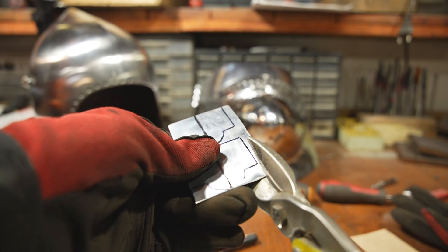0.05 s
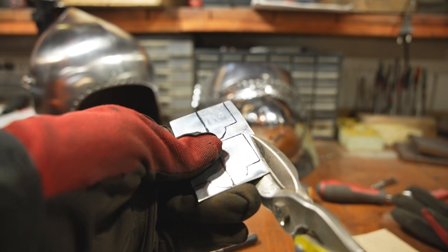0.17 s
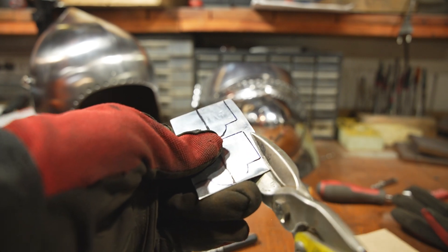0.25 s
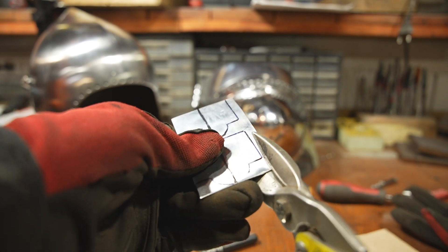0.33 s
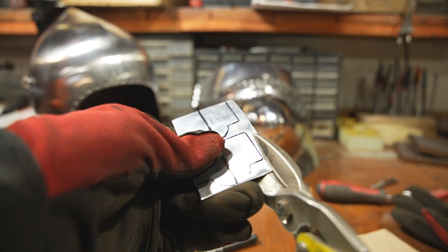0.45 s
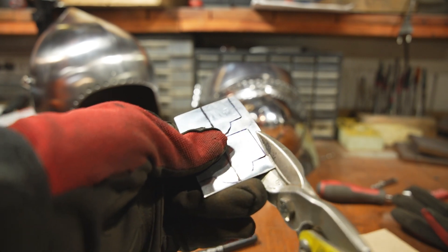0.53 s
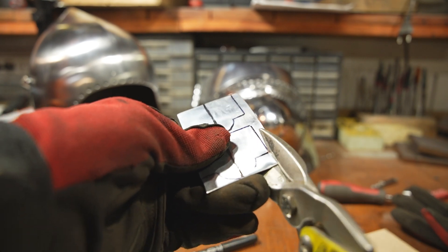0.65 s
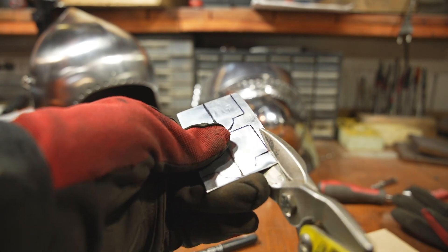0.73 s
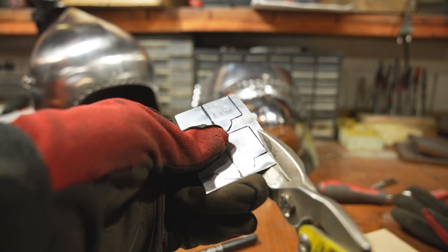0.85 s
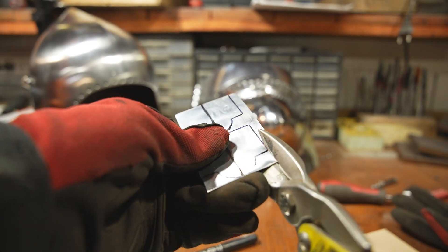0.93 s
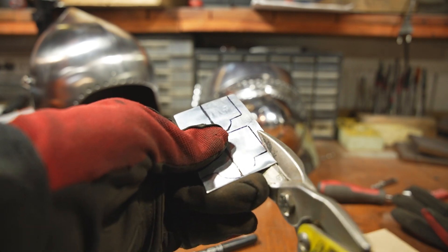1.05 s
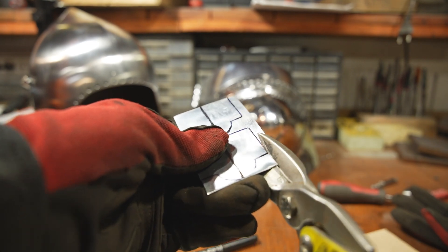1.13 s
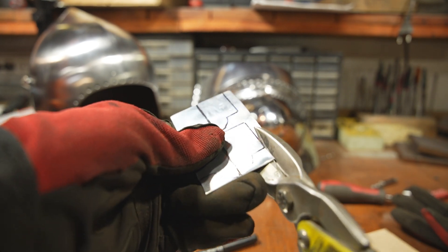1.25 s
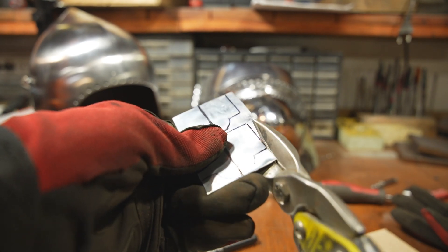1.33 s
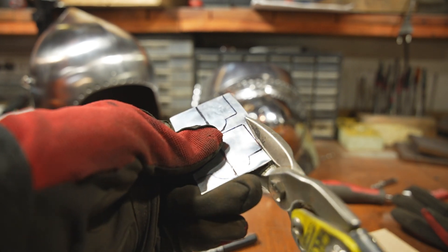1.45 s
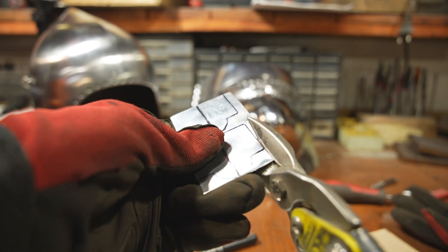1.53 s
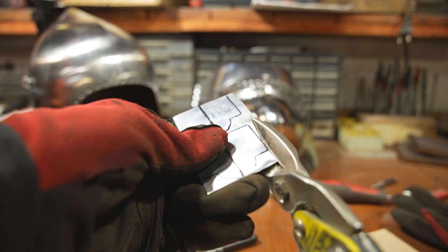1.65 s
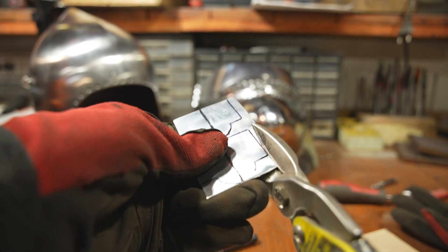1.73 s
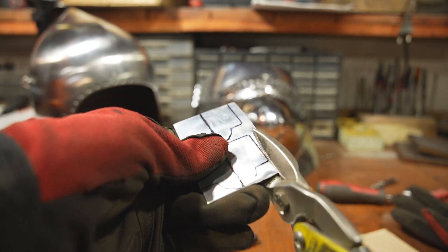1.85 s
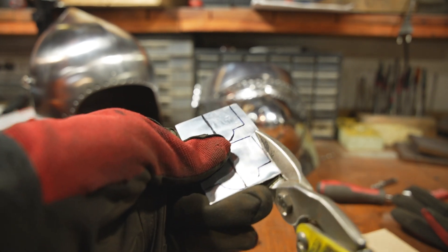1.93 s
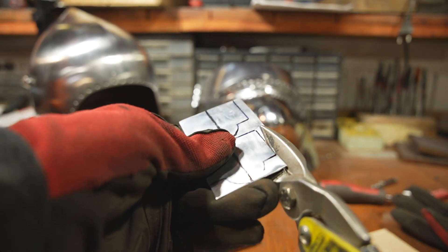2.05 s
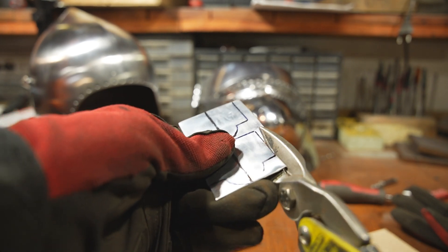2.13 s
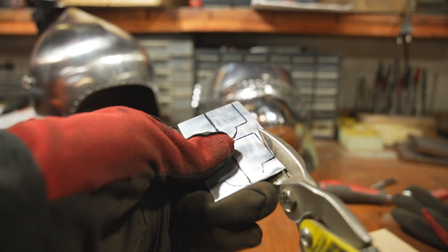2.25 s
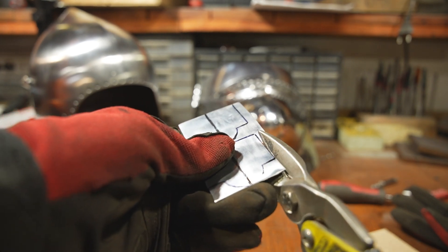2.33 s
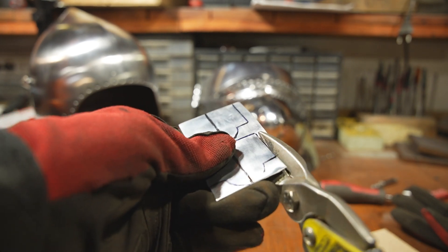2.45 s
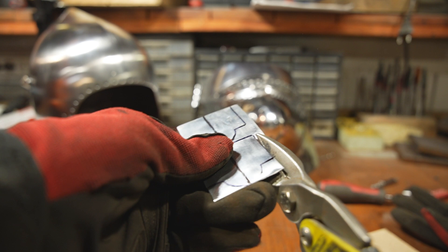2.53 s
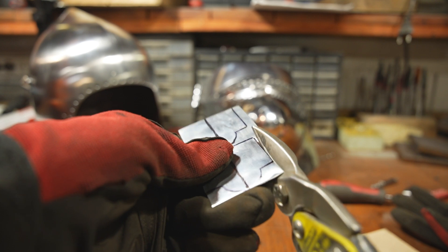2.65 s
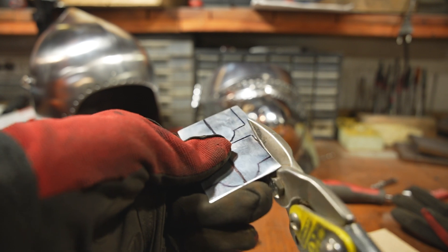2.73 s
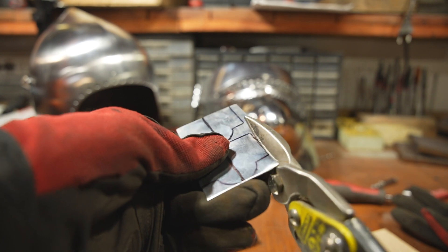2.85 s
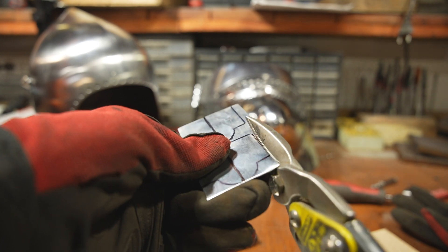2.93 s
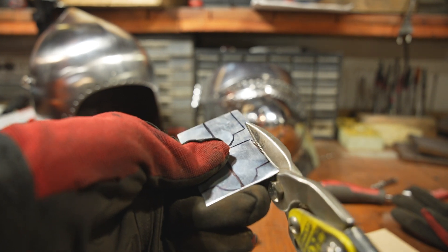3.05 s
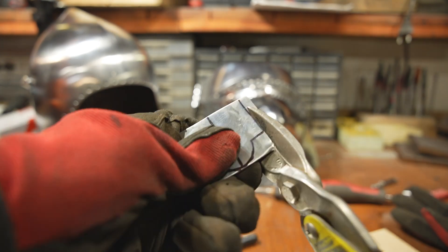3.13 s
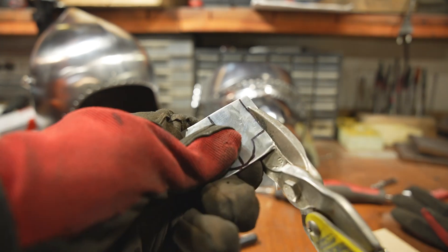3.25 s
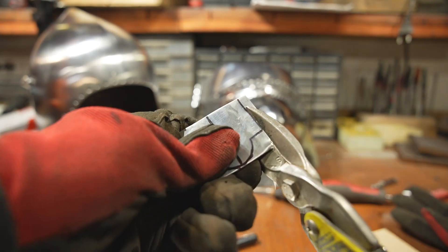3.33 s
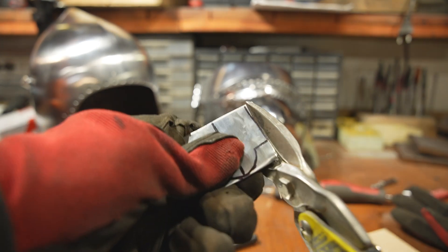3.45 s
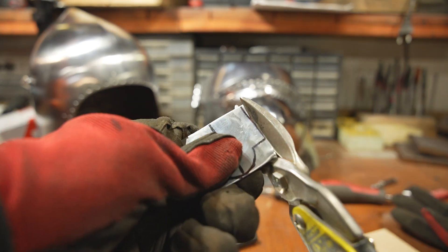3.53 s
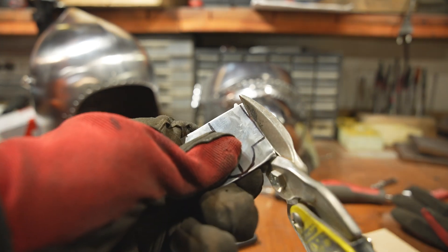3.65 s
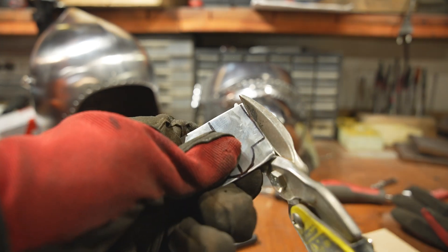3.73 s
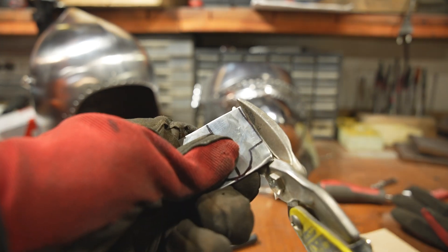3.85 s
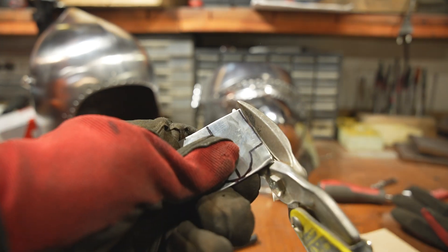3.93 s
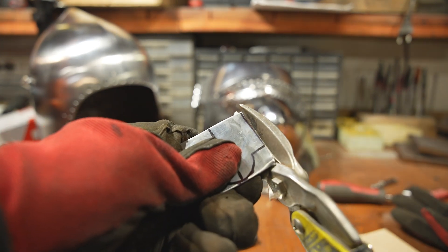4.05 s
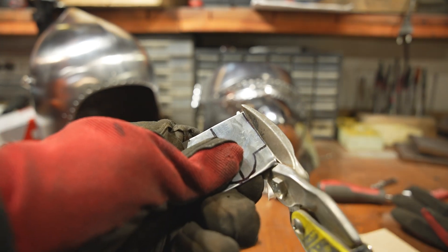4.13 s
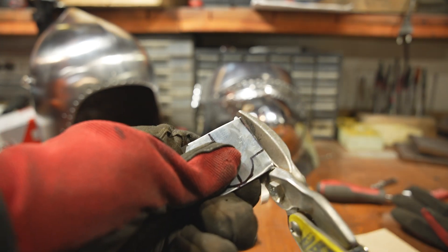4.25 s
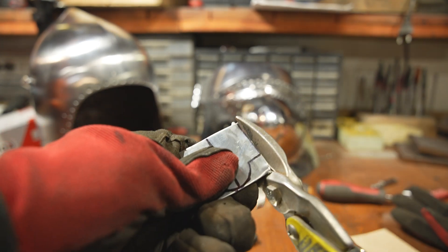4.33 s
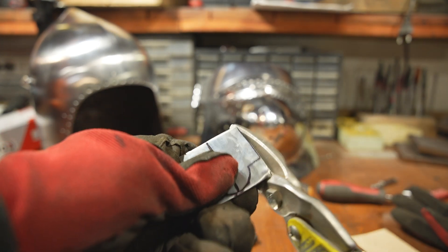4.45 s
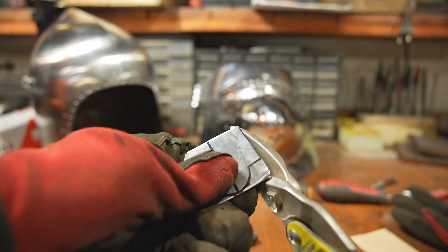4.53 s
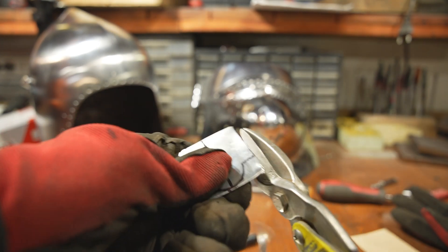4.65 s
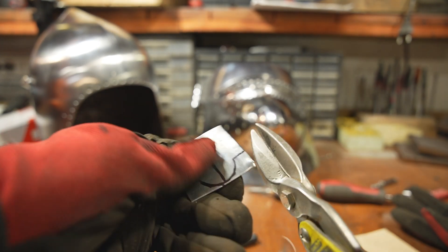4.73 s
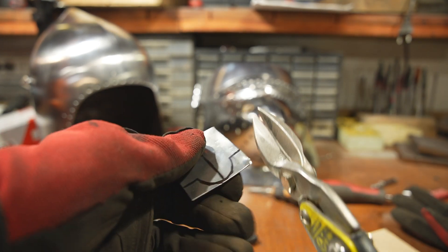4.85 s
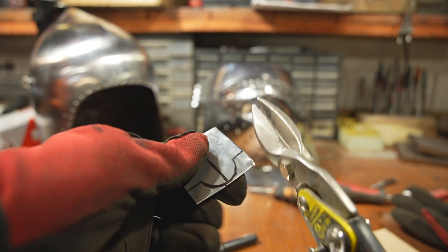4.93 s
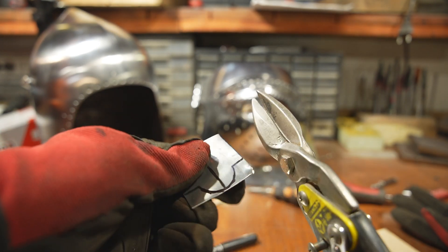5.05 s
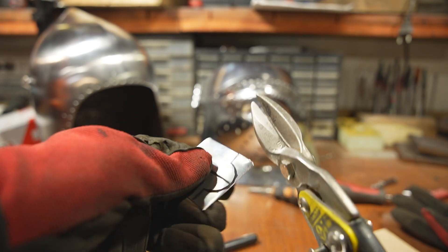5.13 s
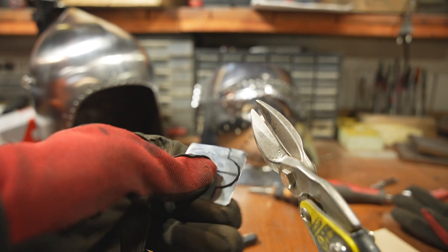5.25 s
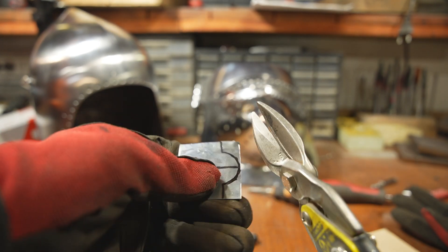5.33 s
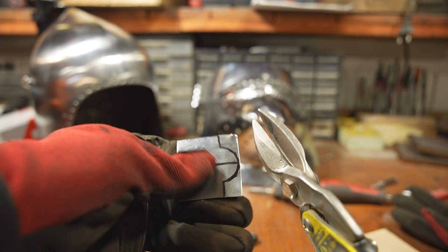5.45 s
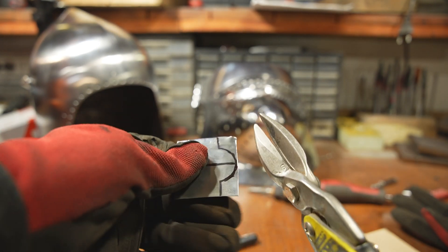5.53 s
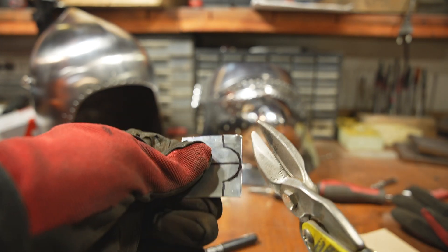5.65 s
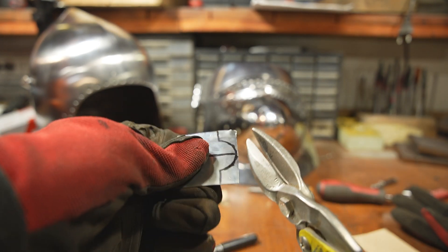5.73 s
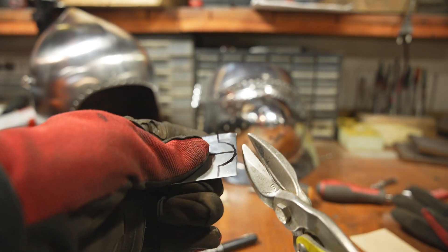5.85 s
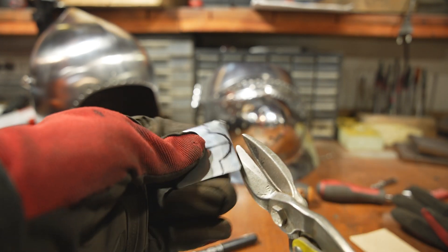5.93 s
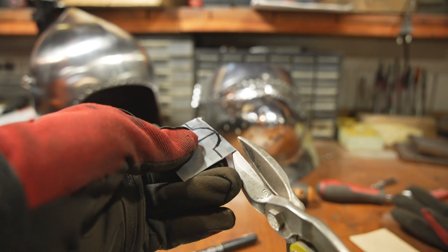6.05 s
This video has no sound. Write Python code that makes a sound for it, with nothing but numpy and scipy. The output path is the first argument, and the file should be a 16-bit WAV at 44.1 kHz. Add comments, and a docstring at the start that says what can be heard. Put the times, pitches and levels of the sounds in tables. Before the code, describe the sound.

Close, dry metal-cutting crunches and small blade ticks, a loud sharp snap, a tinkling steel scrap tumbling, then glove rustle and a brief edge scrape.

```python
"""In a small, quiet workshop, hand snips cut a piece of thin sheet steel held in a gloved hand over a workbench.
Close to the microphones, three cuts crunch as the blades stick and slip; each slip kicks the damped sheet.
The fourth cut snaps through, the jaws shudder, and the offcut bounces and rings further away.
Around the cuts the blades tick against the sheet and slide on it; after the snap the glove rubs the sheet,
fingers knock it and its edge skips on the blade. Filtered noise makes the room air and the reverberant tail."""
import sys
import numpy as np
from scipy import signal
from scipy.fft import rfft, irfft
from scipy.io import wavfile
from scipy.ndimage import uniform_filter1d

SR = 44100
rng = np.random.default_rng(int(sys.argv[2]) if len(sys.argv) > 2 else 0)


def wav_out(sig):
    """Save sig, one row per channel (or a flat mono array), as 16-bit PCM at SR to the path in sys.argv[1]."""
    wavfile.write(sys.argv[1], SR, np.round(np.clip(np.atleast_2d(sig).T, -1, 1) * 32767).astype(np.int16))


N = 268128  # samples in the scene

SIZE = 16384  # samples in one contact sound
HZ = np.fft.rfftfreq(SIZE, 1 / SR)
T = np.arange(SIZE) / SR


def amp(db):
    """Decibels to gain."""
    return 10 ** (np.asarray(db) / 20)


def unit(x):
    """Scales to a mean energy of one per channel."""
    return x / np.sqrt(np.sum(np.atleast_2d(x) ** 2, 1).mean() + 1e-20)


def read(points, hz):
    """Reads a table on a log-frequency axis."""
    f, value = np.transpose(points)
    return np.interp(np.log(hz + 1), np.log(f + 1), value)


def add(mix, s, sound):
    """Mixes a stereo sound in at time s."""
    part = mix[:, round(s * SR):][:, :sound.shape[1]]
    part += sound[:, :part.shape[1]]


# left-right likeness of scattered sound: freq_hz, likeness (0..1)
LIKENESS = [(60, 0.33), (400, 0.68), (1300, 0.83), (4000, 0.73), (7500, 0.34), (15000, 0.12)]


def noise(size, colour=None):
    """Stereo noise of rms one, most alike left and right in the middle range and least in the treble."""
    hz = np.fft.rfftfreq(size, 1 / SR)
    left, other = rfft(rng.standard_normal((2, size)))
    same = np.clip(read(LIKENESS, hz), 0, 1)
    right = same * left + np.sqrt(1 - same ** 2) * other
    gain = amp(read(colour, hz)) if colour else 1
    return unit(irfft(np.array([left, right]) * gain, size)) * np.sqrt(size)


def grain(length, rough_db, size):
    """Random lumps about size steps long, as a gain of rms one."""
    flutter = unit(uniform_filter1d(rng.standard_normal(length), size)) * np.sqrt(length)
    return unit(amp(rough_db * flutter)) * np.sqrt(length)


def body(colour, resonances=()):
    """Response in dB of an object: a broad colour with resonant peaks on it."""
    peaks = sum(db / (1 + (2 * (HZ - hz) / width) ** 2) for hz, width, db in resonances)
    return read(colour, HZ) + peaks


def through(x, response_db):
    """Passes x through a causal (minimum-phase) response."""
    log_gain = np.log(amp(np.r_[response_db, response_db[-2:0:-1]]))
    response = np.exp(np.conj(signal.hilbert(log_gain)))[:len(HZ)]
    return irfft(rfft(x) * response, SIZE)


def scatter(t60):
    """Dense, ragged bending waves dying away in the metal."""
    return unit(noise(SIZE) * grain(SIZE, rough_db=1.5, size=40) * amp(-60 * T / t60))


def blow(response_db, bright_db, click, waves):
    """A sharp click and the waves it starts, through a body; harder contact is brighter."""
    treble = np.clip(np.log(np.maximum(HZ, 1) / 1300) / np.log(7), 0, 1)  # 0 at 1.3 kHz, 1 at 9.1 kHz
    # bending waves carry the treble faster than the bass, so the click spreads into a tiny chirp
    travel_s = rng.uniform(.0009, .0014)  # at 1 kHz
    chirp = irfft(np.exp(-4j * np.pi * travel_s * np.sqrt(1000 * HZ)), SIZE)
    return unit(through(click * chirp + waves, response_db + bright_db * treble))


REBOUNDS = 3  # contacts in each chatter, the first included
REBOUND_DULL_DB, REBOUND_RING_DB = 4, 4  # each rebound is duller and sets less ringing going


def rebounds(rows):
    """Each contact chatters, losing level and brightness: rows start_s, level_db, bright_db."""
    return [(s + k * gap, db - k * loss_db, bright_db - k * REBOUND_DULL_DB)
            for s, db, bright_db, gap, loss_db in rows for k in range(REBOUNDS)]


SLIP_JITTER_S, SLIP_SPREAD_DB, SLIP_COLOUR_DB = .0002, 1.17, 2  # how much one slip differs from the next


def slips(start, length, rate, db, fade_db, bright_db):
    """Steel sticks and slips at a nearly even rate, fading by fade_db: rows start_s, level_db, bright_db."""
    s = np.arange(0, length, 1 / rate)
    late, strong, hard = rng.standard_normal((32, 3))[:len(s)].T
    level_db = db - fade_db * (s / length) ** 2 + SLIP_SPREAD_DB * strong
    return np.transpose([start + s + SLIP_JITTER_S * late, level_db, bright_db + SLIP_COLOUR_DB * hard])


def knocks(rows, response_db, click, t60):
    """Separate short contacts, each a click with its own scattered waves."""
    out = np.zeros((2, N))
    for s, db, bright_db in rows:
        add(out, s, amp(db) * blow(response_db, bright_db, click, scatter(t60)))
    return out


def stroke(start, length, db, skew):
    """Gain of one rubbing movement, which speeds up and slows to a stop."""
    progress = np.clip((np.arange(N) / SR - start) / length, 0, 1)
    return amp(db) * np.sin(np.pi * progress ** skew)  # skew below 1 peaks early, above 1 late


# quiet air of the workshop: freq_hz, level_db
AIR = [(10, -13), (40, -9.5), (80, -4), (190, -4.5), (350, -6), (560, -11), (1700, -18), (3700, -23),
       (13000, -26.5), (16000, -36.5)]


def room_air():
    """Steady coloured noise under the handwork."""
    return amp(-65.5) * noise(N, AIR)


# how long the workshop rings: freq_hz, t60_s
ROOM_T60 = [(150, 0.51), (660, 0.47), (1740, 0.39), (4600, 0.33), (12000, 0.25)]


def workshop(x, colour, wet_db, build_s):
    """A short, dense tail from shelves and walls, each band dying at its own speed."""
    hz, t, bands = signal.stft(noise(SR, colour), SR, nperseg=256)
    decay = amp(-60 * t / read(ROOM_T60, hz)[:, None])
    tail = signal.istft(bands * decay, SR, nperseg=256)[1][:, :SR]
    tail *= 1 - np.exp(-np.arange(SR) / SR / build_s)
    return x + amp(wet_db) * signal.fftconvolve(x, unit(tail), axes=1)[:, :N]


# the glove shifts on the sheet: start_s, length_s, level_db, grip (0 light brushing .. 1 firm rubbing)
GLOVE = [(5.025, 0.51, -63.5, 0.48), (5.452, 0.18, -60.5, 0.027), (5.596, 0.087, -49, 1),
         (5.755, 0.071, -56.5, 0.61), (5.819, 0.07, -52.5, .82), (5.939, .1, -56, .65)]
# colour of light brushing, then of firm rubbing: freq_hz, level_db
BRUSH = [(200, -16), (1000, -6), (4000, -0.5), (12000, -2), (16000, -5)]
RUB = [(120, -57.5), (200, -30), (659, -17), (1650, -3.5), (2090, -15), (2290, -9), (11900, -27.5),
       (14600, -29), (16000, -73)]


def glove():
    """Cloth friction on the sheet: smooth hiss when light, lumpy rasp when firm."""
    rasp = noise(N, RUB) * grain(N, rough_db=2.0, size=90)
    hiss = noise(N, BRUSH)
    cloth = np.zeros((2, N))
    for start, length, db, grip in GLOVE:
        firm = np.clip(grip, 0, 1)
        cloth += stroke(start, length, db, skew=1.06) * (np.sqrt(firm) * rasp + np.sqrt(1 - firm) * hiss)
    return cloth


# steel slides on steel under light pressure: start_s, length_s, level_db
SLIDES = [(0.136, 0.12, -67.5), (0.521, 0.057, -66), (0.638, 0.13, -67), (1.291, 0.15, -55.5),
          (3.205, 0.16, -61.5), (4.027, .2, -67.5)]
# colour of the blades touching the sheet, also used by ticks and bites: freq_hz, level_db
TICK_COLOUR = [(25, -19), (70, -8), (220, -25), (800, -17), (1250, 2), (1750, -7.5), (2200, -11.5),
               (2900, -8.5), (4000, -14), (5500, -27), (12000, -28.5), (16000, -41.5)]
# the resonance that sliding brings out: freq_hz, width_hz, boost_db
SING = [(1230, 120, 7.5)]


def slides():
    """Grainy sliding friction of the blade makes the sheet sing faintly."""
    strokes = sum(stroke(*row, skew=0.45) for row in SLIDES)
    rubbing = strokes * noise(N) * grain(N, rough_db=4.5, size=160)
    impulse = 1.0 * (T == 0)
    sheet = unit(through(impulse, body(TICK_COLOUR, SING)))
    return signal.fftconvolve(rubbing, sheet[None], axes=1)[:, :N]


# the sheet knocks on the gloved fingers as it is turned:
# start_s, level_db, bright_db, rebound_gap_s, rebound_loss_db
REGRIP = [(5.8444, -16, -2.5, .0078, 7.5), (5.872, -33, 3, 0.0054, 9)]
# colour of those knocks: freq_hz, level_db
FINGERS = [(40, -25), (250, 1), (600, -7), (1500, -1.5), (3200, -8), (5000, -23), (16000, -25)]


def regrip():
    """Quickly damped knocks of sheet on glove, each with rebounds."""
    return knocks(rebounds(REGRIP), body(FINGERS), click=1.0, t60=0.013)


# blades seat on the sheet or ease off it: start_s, level_db, bright_db, rebound_gap_s, rebound_loss_db
TICKS = [(.5418, -29, -1, .005, 5), (.6648, -35, 1, .014, 4.5), (1.1471, -21.5, -9.5, .004, 12),
         (1.4262, -19, -11, .01, 5), (1.994, -29, 3, .006, 22), (2.001, -18, -8.5, .004, 9),
         (2.034, -34.5, 7, .005, 10), (2.3607, -27.5, -4, .004, 9.5), (2.4432, -11, 1.5, .0025, 1.5),
         (4.0897, -29.5, -3.5, .005, 7), (4.4412, -12.5, 3, .0048, 0)]


def ticks():
    """Small chattering contacts of blade on sheet."""
    return knocks(rebounds(TICKS), body(TICK_COLOUR), click=0.45, t60=.026)


# the edges take up the load and bite into the steel: start_s, level_db, bright_db
BITES = [(1.2439, -20.5, -1), (2.598, -24, -7), (2.6328, -32.5, -2.5), (2.6561, -22.5, -5),
         (3.4298, -33, -2)]
# resonance of a bite: freq_hz, width_hz, boost_db
BITE_RING = [(1830, 510, 12.5)]


def bites():
    """Single contacts without rebounds, resonant and quickly damped."""
    return knocks(BITES, body(TICK_COLOUR, BITE_RING), click=0.42, t60=0.014)


# the sheet's edge skips along the open blade, one row:
# start_s, length_s, slips_per_s, slip_level_db, end_fade_db, bright_db
SKIP = (6.0595, .018, 204.5, -10.5, 0, 2)
# colour of the skipping: freq_hz, level_db
SKIP_COLOUR = [(120, -55), (200, -20), (791, -10), (1300, -20.5), (1810, -7), (3250, -15), (3900, -7.5),
               (5730, -8), (6280, -14.5), (14100, -18), (16000, -23)]
# resonances of the edge: freq_hz, width_hz, boost_db
EDGE = [(780, 150, 1), (1810, 150, 7), (3860, 260, 8), (10200, 370, 10), (12100, 400, 9)]


def skip():
    """A quick run of stick-slip contacts of edge on blade."""
    return knocks(slips(*SKIP), body(SKIP_COLOUR, EDGE), click=0.26, t60=0.052)


# the offcut lands and tumbles:
# start_s, level_db, bright_db, rebound_gap_s, rebound_loss_db, free_ring_db
BOUNCES = [(4.6133, 6.5, 4.5, 0.0036, 5, -16), (4.6614, 0.5, 4.5, 0.0048, 1.5, -15.5),
           (4.7794, -4.5, 15.5, .006, 11, -15), (4.792, -6, -3, .004, 5, -22.5),
           (4.8005, -3.5, 3.5, .005, 9.5, -17), (4.828, -14.5, -5.5, .004, 11, -26),
           (4.889, -13, -8, .005, 8.5, -40), (4.908, 4.5, 1, .006, 10, -7), (4.922, 6, 8, .005, 6.5, 10.5),
           (4.9646, -1, 8, .0045, 0.5, 4.5), (4.991, -2.5, 2.5, .008, 2.1, 3)]
# colour of the bench: freq_hz, level_db
BENCH = [(40, -23), (200, -12), (400, -6), (600, -6.5), (920, 0), (1300, -4.5), (1950, 1.5), (2700, -7.5),
         (4300, -3.5), (6500, -9.5), (12000, -11), (16000, -14)]
# modes of the free offcut: freq_hz, level_db, t60_s
OFFCUT = [(5000, -2.5, 0.2), (5450, -3.5, 0.15), (6130, 0.5, .17), (6150, -1.5, 0.16), (7440, -4.5, .2),
          (8000, -4, 0.11), (9900, -12, .35), (10350, 3, 0.17), (10640, -2, .16), (11800, -7, .17),
          (13090, 3, 0.14), (14372, -11, .17)]
# its many lesser modes: freq_hz, level_db
SLIVER = [(1000, -28.5), (4000, -14), (5200, 1.5), (7000, -7), (11000, 1.5), (16000, -5.5)]


def offcut(ring_db, jangle_db, jangle_t60, knock_t60, spread, rest_s, rest_t60):
    """Each landing knocks the bench and sets the sliver ringing with a new mix of its modes."""
    taps, rings, bench = np.zeros((2, N)), np.zeros((2, N)), body(BENCH)
    hz, mode_db, t60 = np.transpose(OFFCUT)[:, :, None]
    modes = amp(mode_db - 60 * T / t60) * np.exp(2j * np.pi * hz * T)
    for *landing, loss_db, free_db in BOUNCES:
        for k, (s, db, bright_db) in enumerate(rebounds([(*landing, loss_db)])):
            size, turn = rng.standard_normal((2, 2, len(OFFCUT)))
            phase = 2 * np.pi * rng.random(len(OFFCUT)) + spread * turn  # spread parts left from right
            ring = unit(((amp(1.4 * size) * np.exp(1j * phase)) @ modes).real)
            jangle = unit(through(scatter(jangle_t60), body(SLIVER)))
            ringing = amp(ring_db) * ring + amp(jangle_db) * jangle
            add(taps, s, amp(db) * blow(bench, bright_db, 0.18, scatter(knock_t60)))
            add(rings, s, amp(free_db - k * (loss_db + REBOUND_RING_DB)) * ringing)
    resting_s = np.maximum(np.arange(N) / SR - rest_s, 0)  # lying flat, it is damped by the bench
    return taps + rings * amp(-60 * resting_s / rest_t60)


# the last bridge of steel gives, then breaks and the jaws slam shut:
# start_s, level_db, bright_db, rebound_gap_s, rebound_loss_db
SNAP = [(4.5125, -7, 0, 0.0022, 13.5), (4.5142, 8.5, 2.5, .0016, 2)]
# colour of the break, then of the jaws: freq_hz, level_db
SNAP_COLOUR = [(35, -61.5), (60, -28.5), (785, -21.5), (1060, -10), (1910, -3), (2710, -9), (4030, -8),
               (4420, -11), (5210, -10), (8710, -16), (10800, -16), (12400, -7), (16000, -26)]
JAW_COLOUR = [(41, -53), (70, -22), (412, -14), (649, -20.5), (1120, -2), (1310, -10), (2660, -3.5),
              (3490, -11), (4000, -7), (12500, -13), (16000, -25)]
# resonances of the jaws: freq_hz, width_hz, boost_db
JAWS = [(1119, 120, 5), (1907, 100, 3.5), (2340, 140, 7.5), (3080, 300, 4), (4060, 370, 4),
        (12500, 440, 5.5)]


def snap(ring_db, ring_t60):
    """The break cracks, and the released jaws and spring shudder on."""
    crack = knocks(rebounds(SNAP), body(SNAP_COLOUR, JAWS), click=0.22, t60=0.024)
    shudder = unit(through(scatter(ring_t60), body(JAW_COLOUR, JAWS)))
    add(crack, SNAP[0][0], amp(ring_db) * shudder)
    return crack


def cut(squeeze, response_db, click, shiver, ring, ring_t60):
    """Each slip of the blades kicks the same gloved, quickly damped sheet."""
    out, sheet = np.zeros((2, N)), scatter(ring_t60)
    for s, db, bright_db in slips(*squeeze):
        # part of the ringing repeats from slip to slip, part is new
        waves = shiver * scatter(0.014) + ring * (sheet + 0.99 * scatter(ring_t60))
        add(out, s, amp(db) * blow(response_db, bright_db, -click, waves))
    return out


# each squeeze of the snips: start_s, length_s, slips_per_s, slip_level_db, end_fade_db, bright_db
CUTS = [(1.3291, 0.027, 193, 0, 15, -1), (2.6669, .055, 181.5, 1, 1.5, .5),
        (3.4709, .053, 207, -6.5, 1.5, 1)]
# colour of the sheet in each cut: freq_hz, level_db
SHEET_1 = [(29, -59.5), (50, -29), (646, -16), (1050, -6), (1430, -4.5), (2010, -17), (2380, -10),
           (3410, -18.5), (3850, -13.5), (6710, -21.5), (11100, -15), (16000, -36)]
SHEET_2 = [(29, -67.5), (50, -33), (284, -27), (507, -15), (765, -18), (1070, -6), (1430, -4.5), (1870, -9),
           (4140, -12.5), (6090, -23.5), (11400, -18.5), (16000, -33.5)]
SHEET_3 = [(59, -67), (100, -45), (210, -15.5), (308, -23.5), (461, -12), (721, -12.5), (1150, -5),
           (2520, -11.5), (2860, -8.5), (4670, -10), (6020, -18), (12900, -17.5), (16000, -28)]
# resonances of the sheet, held flat and then turned: freq_hz, width_hz, boost_db
FLAT = [(370, 120, 4.5), (1085, 60, 3.5), (1430, 80, 5), (1670, 130, 3.5), (2700, 230, 4.5), (3880, 250, 5),
        (8750, 3400, 2)]
TURNED = [(1150, 150, 5.4), (1340, 82, 4.2), (3000, 320, 6), (3820, 250, 7.3), (4820, 470, 8.8)]


def three_cuts():
    """Three stick-slip crunches, the sheet held flat for two and turned for the third."""
    first = cut(CUTS[0], body(SHEET_1, FLAT), click=0.65, shiver=0.53, ring=.35, ring_t60=.04)
    second = cut(CUTS[1], body(SHEET_2, FLAT), click=0.91, shiver=.6, ring=.5, ring_t60=0.044)
    third = cut(CUTS[2], body(SHEET_3, TURNED), click=0.71, shiver=0.69, ring=0.57, ring_t60=0.049)
    return first + second + third


# what the hand-held sheet radiates into the room: freq_hz, level_db
SPILL = [(300, -0.5), (1100, -5), (2200, 1), (4000, -1.5), (6500, 1.5), (14000, -1.5)]


def scene():
    """The handwork is close and slightly right of centre; the offcut lands further away."""
    held = glove() + slides() + regrip() + ticks() + bites() + skip()
    held += snap(ring_db=8.0, ring_t60=0.43) + three_cuts()
    fallen = offcut(ring_db=-0.5, jangle_db=0.5, jangle_t60=.16, knock_t60=0.06,
                    spread=.9, rest_s=5.01, rest_t60=0.12)
    heard = workshop(held, SPILL, wet_db=-15.5, build_s=0.0042)
    heard += workshop(fallen, None, wet_db=-11.5, build_s=0.0069)
    lag_s = 2e-5  # the sound reaches the left microphone a little later
    delay = np.exp(-2j * np.pi * np.fft.rfftfreq(N, 1 / SR) * lag_s)
    heard[0] = irfft(rfft(heard[0]) * delay, N)
    return heard * amp([[-.1], [1.1]]) + room_air()  # left and right gains in dB


def record(dry):
    """The recorder's band limit: a steep low-pass at 16.1 kHz."""
    lowpass = signal.firwin(255, 16100, window=("kaiser", 9), fs=SR)
    return signal.oaconvolve(dry, lowpass[None], "same")


dry = scene()
out = record(dry)
wav_out(out)
```